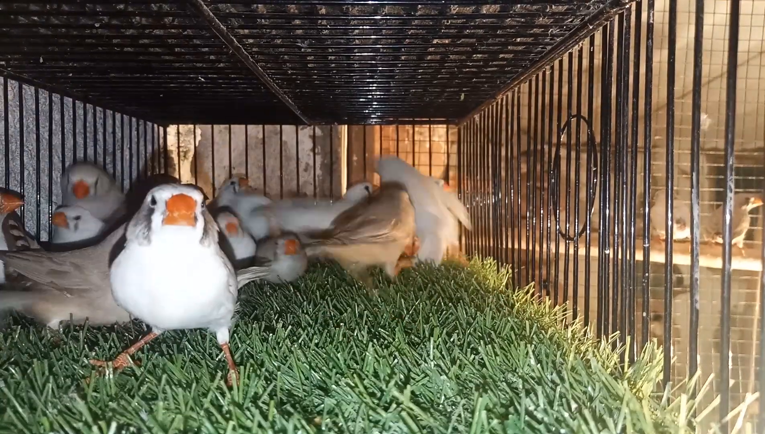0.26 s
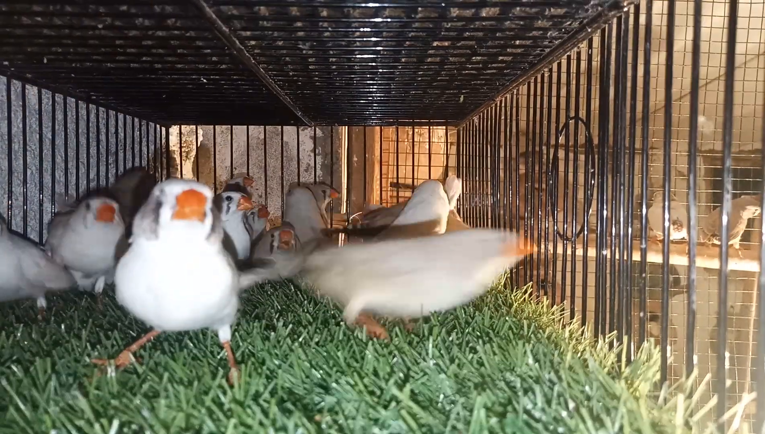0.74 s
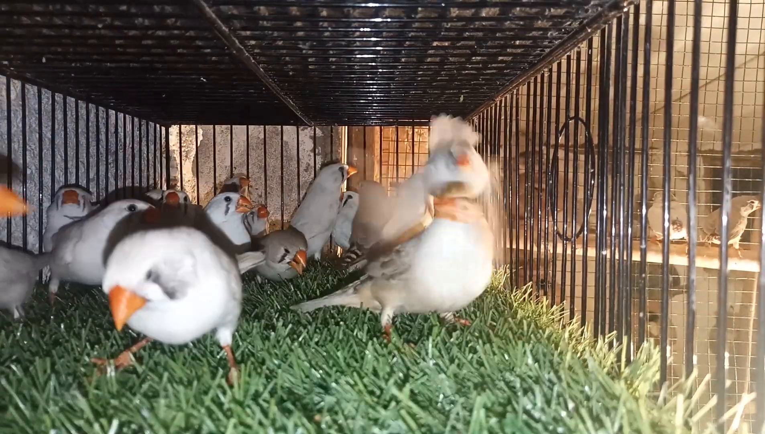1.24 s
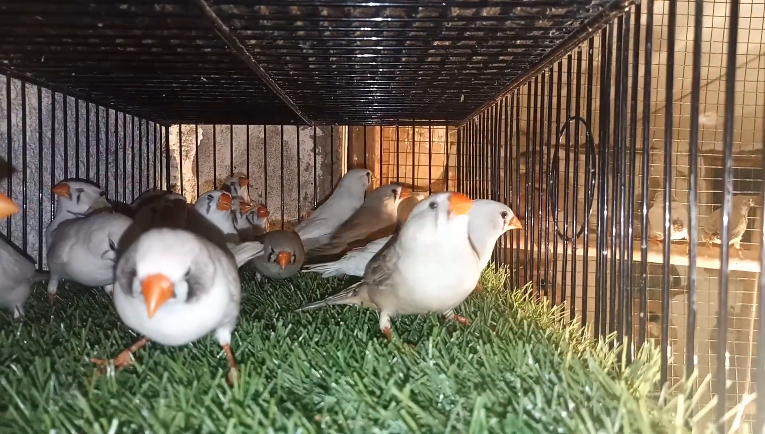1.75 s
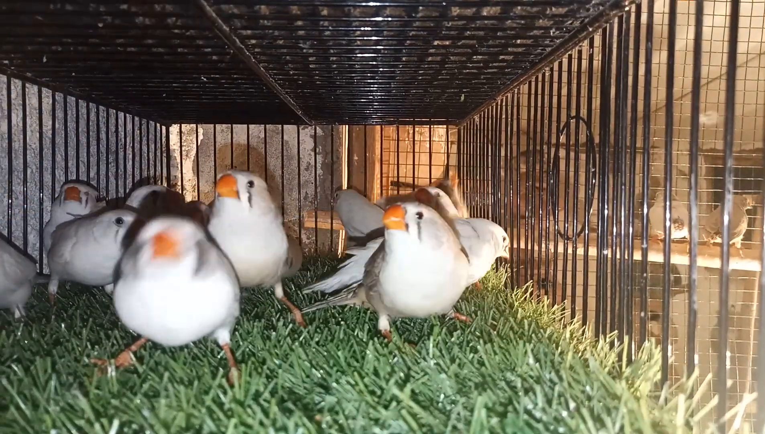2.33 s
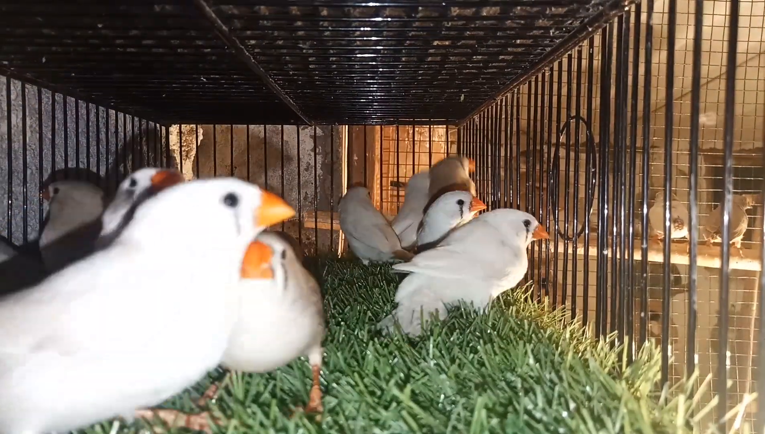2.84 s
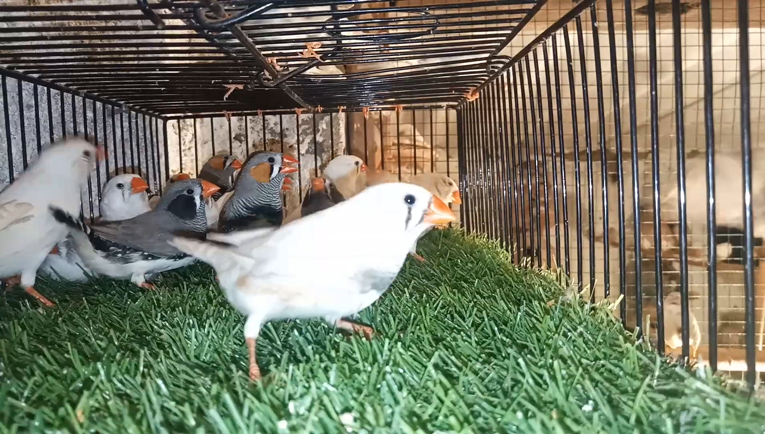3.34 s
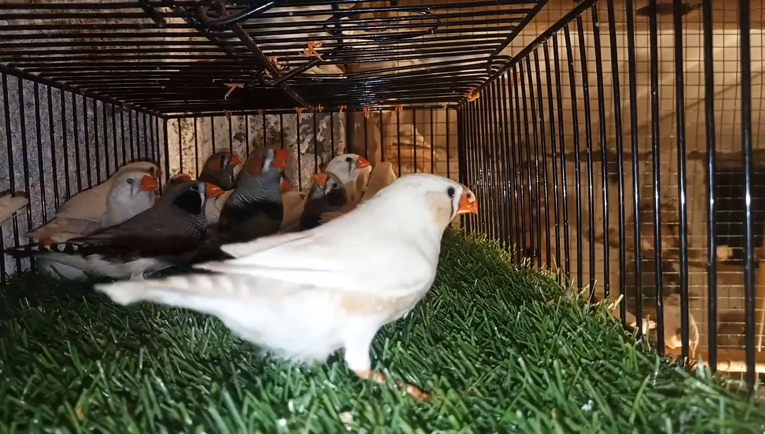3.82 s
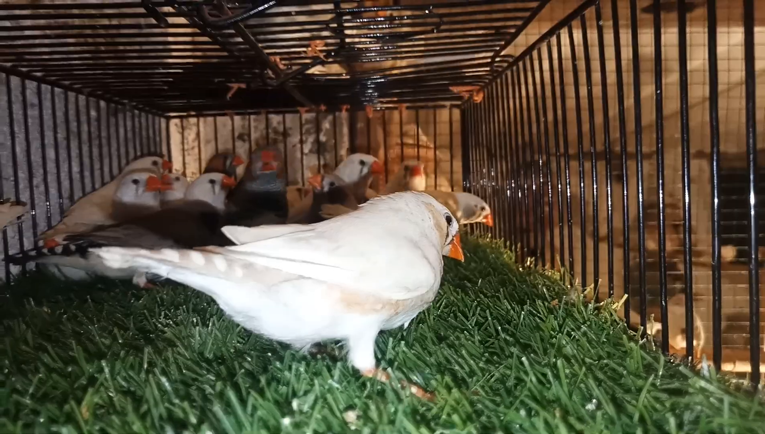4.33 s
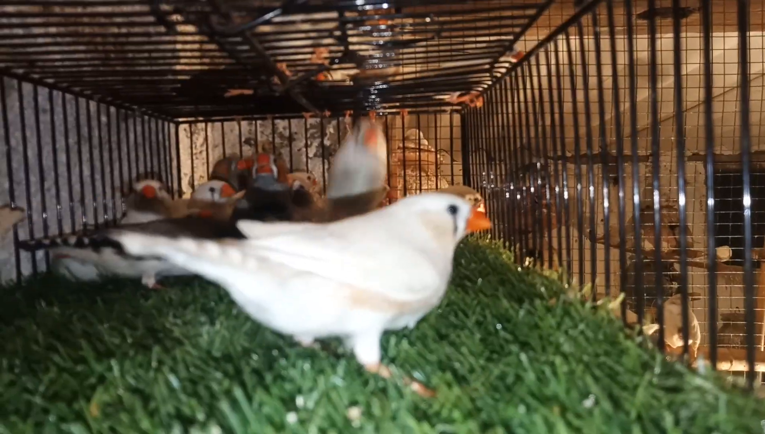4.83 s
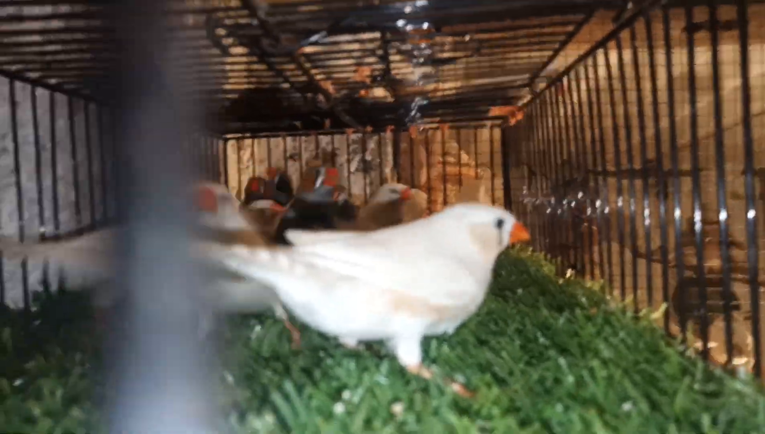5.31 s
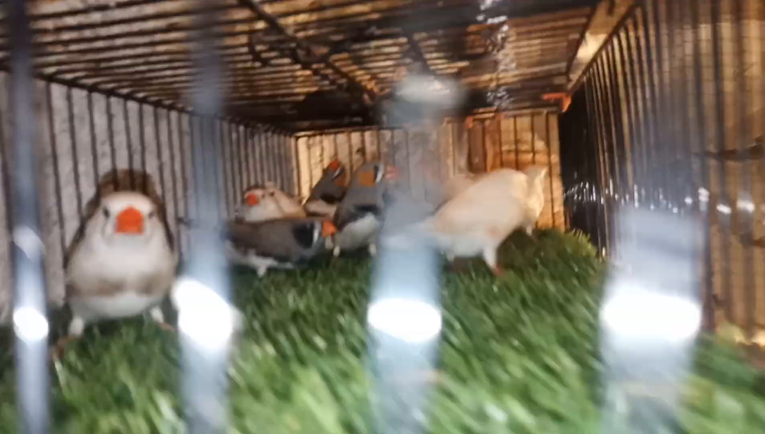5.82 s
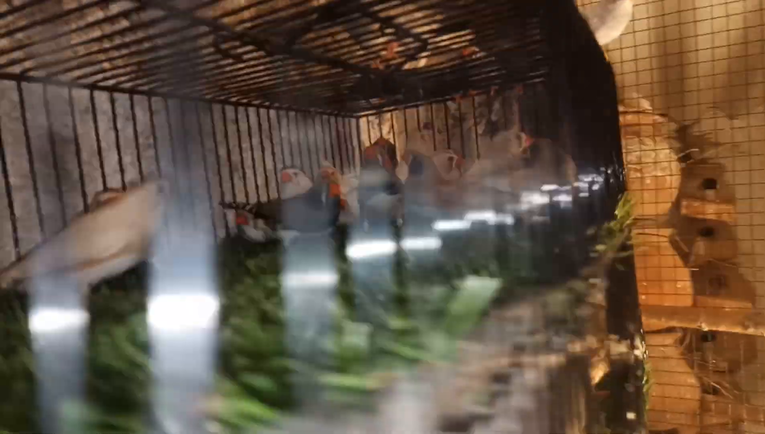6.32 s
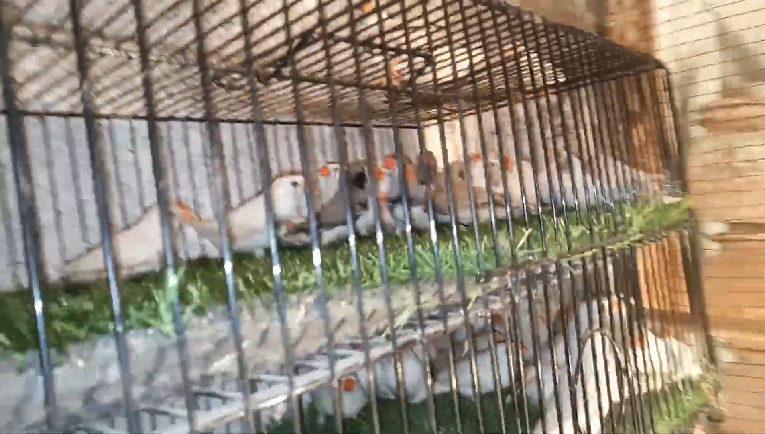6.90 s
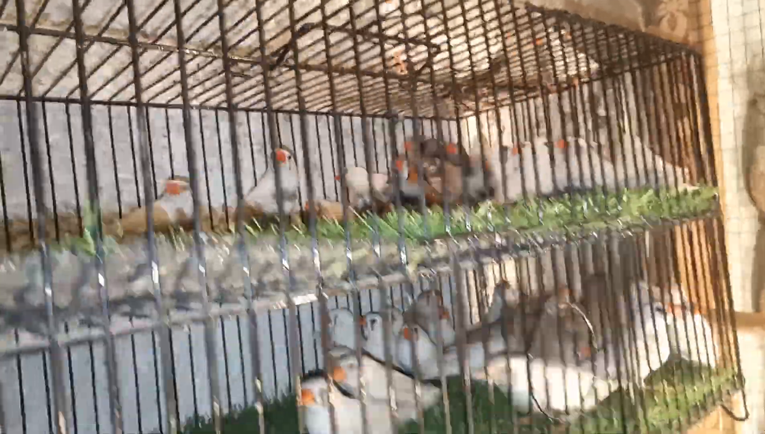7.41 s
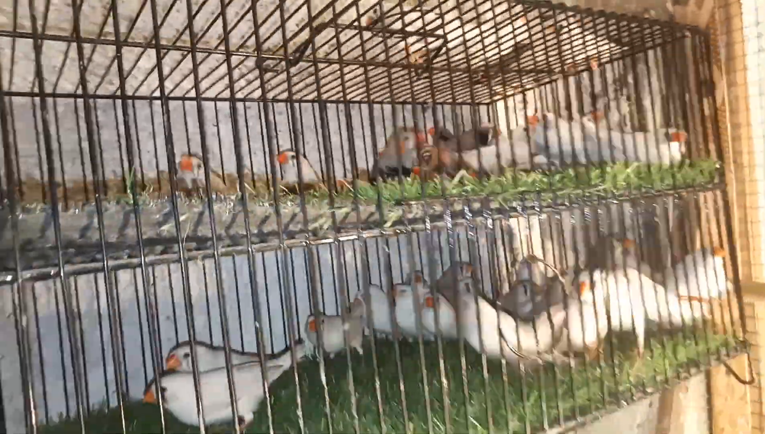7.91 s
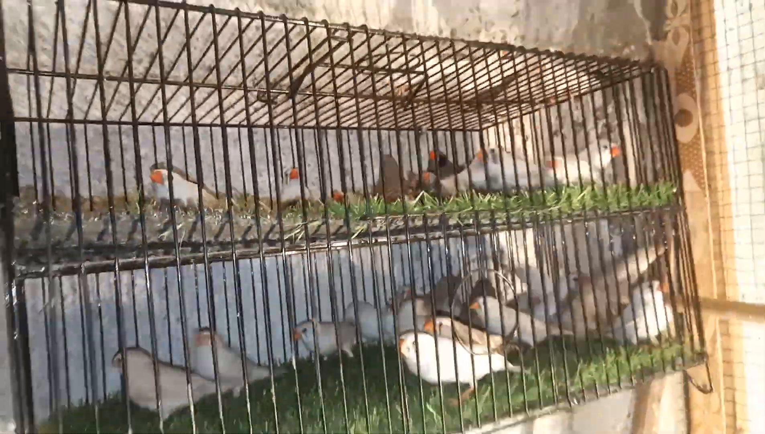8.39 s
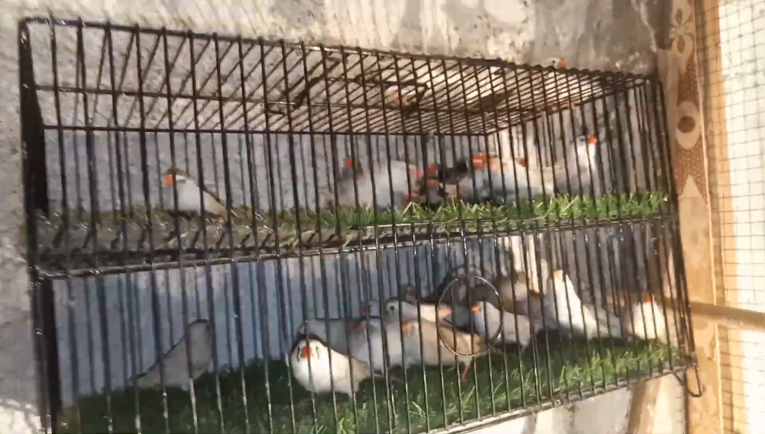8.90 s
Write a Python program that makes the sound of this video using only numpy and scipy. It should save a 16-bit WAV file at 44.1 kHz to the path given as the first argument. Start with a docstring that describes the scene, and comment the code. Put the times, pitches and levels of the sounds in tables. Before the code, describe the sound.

Caged finches honk and chirp in quick nasal bursts, rasping loudest later on, over soft wing rustle, low rumble and a few cage knocks.

```python
"""Short nasal finch calls close by, louder raspy chirps and two screeches further off, and a chattering flock behind.
Place: cages in a hard-walled shed, a phone microphone close to the nearest birds. Calls are overtone stacks shaped
by beak and windpipe; chirps, screeches and faint tones are gliding tones with warble or crackle. Filtered noise
gives wing rustle and a low rumble, decaying sines the cage knocks; decaying noise is the room. The sound drops
out once."""
import sys
import numpy as np
from scipy import signal
from scipy.fft import rfft, irfft
from scipy.io import wavfile
from scipy.ndimage import uniform_filter1d

SR = 44100
rng = np.random.default_rng(int(sys.argv[2]) if len(sys.argv) > 2 else 0)


def to_wav(sig):
    """Store sig (one row per channel, or 1-D mono) as 16-bit WAV at the path in sys.argv[1].

    Samples outside -1..1 are clipped; the rate is SR.
    """
    pcm = np.clip(np.atleast_2d(sig), -1, 1) * 32767
    pcm = np.round(pcm).astype(np.int16)
    wavfile.write(sys.argv[1], SR, pcm.T)  # frames by channels


def convert_level_to_amplitude(level_db):
    """Map a level in decibels to its linear amplitude factor."""
    exponent = np.asarray(level_db, float) / 20
    return 10 ** exponent


N = 403515

# Near finch calls: (start [s], length [s], top pitch [Hz], slant [share of pitch, + ends higher],
# rms before the swell [dB], beak resonance [Hz], windpipe resonance [Hz], windpipe against beak [dB])
NEAR_CALLS = [(-0.04, 0.09, 596.3, -0.0078, -25, 3404, 1670, -13.5),
              (0.122, 0.075, 637, 0.02, -34, 3340, 2240.0, -18),
              (0.217, 0.069, 657, 0.03, -32.5, 3170, 2640, -13.5),
              (0.48, 0.07, 520, 0.02, -39, 3480, 1040, 13),
              (0.672, 0.078, 612, 0.085, -33.5, 4020, 1720, -2),
              (0.86, 0.08, 474, 0.024, -34.5, 4240, 1900.0, 3),
              (0.895, 0.074, 527, -0.044, -27.5, 3860, 1460.0, -7.5),
              (1.19, 0.07, 665.5, -0.0394, -27.5, 3620, 2080.0, -8.5),
              (1.29, 0.074, 596, -0.01, -28.5, 3460, 1330.0, -6),
              (1.51, 0.05, 566.6, 0.0, -33, 3590, 1290.0, -8.5),
              (2.2, 0.045, 644, -0.02, -26.5, 3560, 1610, -8),
              (2.46, 0.13, 600.5, 0.0096, -27.5, 3520, 1420.0, -6),
              (2.71, 0.049, 632, -0.031, -27.5, 3450, 1870.0, -32),
              (2.79, 0.029, 597, -0.059, -37, 3340, 2250.0, -15),
              (2.84, 0.058, 545, -0.026, -38, 3690.0, 2180.0, -15),
              (3.25, 0.093, 620, -0.04, -25.5, 3480, 1930.0, 0),
              (3.665, 0.042, 572, 0.029, -29.5, 3440, 2030.0, -16),
              (4.03, 0.13, 656, -0.086, -31, 4020, 2630, -4.5),
              (4.213, 0.0754, 578.4, 0.04, -27, 3600, 2130.0, 6),
              (4.32, 0.081, 530.5, 0.00033, -30, 3820, 1590, -5),
              (4.715, 0.07, 565, 0.03, -32, 3650, 2100, 2),
              (4.795, 0.045, 550, -0.011, -29.5, 3500, 1790.0, -12.5),
              (4.85, 0.053, 490.0, 0.00075, -36, 4270, 1710, 14),
              (4.95, 0.058, 501, -0.02, -36.5, 3300, 1940.0, 0),
              (5.02, 0.048, 516, -0.01, -29.5, 3500, 2330, -2),
              (5.25, 0.05, 595, -0.074, -33, 3600, 1890.0, 1),
              (5.33, 0.032, 570, -0.031, -36.5, 3450, 2140.0, -12),
              (5.39, 0.033, 549, -0.029, -31.5, 3800, 2020.0, -11.5),
              (5.46, 0.06, 503, -0.022, -36, 3520.0, 2180.0, -6),
              (5.65, 0.023, 570, 0.03, -35.5, 3970, 2200, -4),
              (5.745, 0.058, 660, 0.04, -34.5, 3920, 2610.0, -12),
              (5.8, 0.065, 649.5, -0.07, -25, 3790.0, 2200, -7.5),
              (5.81, 0.056, 506, -0.04, -35.5, 3880, 1000, -5),
              (5.88, 0.055, 636, -0.039, -33, 3640, 2330, -20),
              (6.015, 0.091, 548.5, 0.013, -35.5, 3260, 1680, -2),
              (6.1, 0.071, 558, 0.0029, -31, 3700, 1840.0, -11),
              (6.16, 0.06, 563.6, -0.0406, -33.5, 3620, 1970.0, 3),
              (6.82, 0.1, 599, -0.12, -28.5, 3650, 1900, -17.5),
              (6.925, 0.057, 560, -0.06, -30.5, 3530, 2210, -15),
              (7.07, 0.06, 508, -0.019, -30.5, 3540, 2530.0, -17),
              (7.15, 0.073, 557, -0.062, -35, 4000, 2460.0, 0),
              (7.22, 0.053, 530, -0.103, -33, 3500, 1510, -4.5),
              (7.325, 0.065, 612.5, 0.05, -33, 3780, 1480.0, -6.5),
              (7.38, 0.066, 541.6, 0.015, -29.5, 3720, 1850, -5.5),
              (7.5, 0.18, 643, -0.059, -32.5, 3500, 2490.0, -16.5),
              (8.09, 0.083, 516, -0.098, -38, 3600, 2010.0, -12.5),
              (8.35, 0.11, 495, -0.07, -34, 3900, 1970.0, -15),
              (8.56, 0.11, 493.5, 0.0072, -30, 3640, 1890.0, -17.5),
              (8.72, 0.078, 516, -0.071, -31.5, 3530, 1920.0, -1),
              (8.9, 0.073, 503, -0.04, -35.5, 3730, 2120.0, -18),
              (9.015, 0.18, 513.6, -0.022, -33.0, 3820.0, 2200, -14)]
# Finch voice before beak and windpipe: (frequency [Hz], level [dB])
THROAT_SPECTRUM = [(620, -11.5), (1100, -3), (3000, -1.5), (4300, -2), (5000, -8), (6200, -10.5),
                   (8000, -23.5)]
# Raspy chirps further off: (start [s], length [s], first pitch [Hz], relative level [dB], warble rms [Hz])
CHIRPS = [(.222, 0.033, 2495, -34, 492), (.275, 0.044, 4500, -37, 89), (.298, 0.029, 3850, -28, 450),
          (.478, 0.048, 2603, -19, 602.5), (.49, 0.052, 2193, -26, 60), (1.89, .058, 3926, -34.5, 487),
          (1.95, 0.056, 4400, -29, 39.5), (1.995, .05, 3400, -33, 120), (2.02, 0.045, 3870, -35.5, 587),
          (3.186, .034, 3320, -34.5, 593), (3.27, .05, 3253, -22, 595), (3.965, 0.031, 2700, -26, 333),
          (3.972, 0.044, 3940, -28.5, 248), (3.975, .05, 1795, -30, 298), (4.28, 0.029, 3220, -23.5, 403),
          (4.425, 0.063, 3240, -32.5, 202), (4.55, 0.031, 2394, -33, 196), (4.72, .08, 3737, -29, 500),
          (5.062, 0.04, 3150, -35, 108.4), (6.04, 0.05, 3950, -33, 583), (6.105, .065, 4580, -32, 112),
          (6.165, .07, 3770, -30, 394), (6.331, 0.032, 3290, -17, 700), (6.39, .032, 3450, -19.5, 833),
          (6.43, 0.05, 3610, -21.5, 510), (6.465, 0.02, 2003, -25, 59.6), (6.467, 0.033, 4085, -23, 101),
          (6.554, .022, 4006, -16.5, 580), (6.642, .027, 4100, -14.5, 637), (6.84, 0.06, 3970, -31.5, 403),
          (6.9, .05, 3435, -30, 300), (7.655, 0.045, 2365, -20, 116), (7.668, 0.036, 3298, -14.5, 202),
          (7.69, .054, 2935, -16.5, 116.7), (7.80, 0.069, 2528, -14, 214.5), (7.91, 0.032, 4470, -23.5, 61),
          (7.94, 0.13, 2195, -23.5, 110.3), (7.96, .06, 4130, -24, 354), (8.033, 0.029, 3850, -10.5, 149.3),
          (8.06, 0.028, 4890, -20, 156), (8.145, .044, 3424, -20, 597), (8.18, .05, 4120, -19.5, 183),
          (8.375, 0.054, 1983, -33, 39), (8.385, 0.098, 3930, -31, 108), (8.435, .03, 3317, -23.5, 688),
          (8.48, 0.039, 3625, -22, 199), (8.568, 0.036, 3830, -22, 118), (8.655, 0.089, 3450, -31, 151),
          (8.727, .06, 3824, -25.5, 308), (8.77, 0.049, 3470, -32.5, 200), (8.745, 0.046, 1610, -32.5, 348)]
# Chirp overtones, multiples 1 to 5 of the pitch, before effort: (relative level [dB])
CHIRP_OVERTONES_DB = [-1.5, -10.5, -13.5, -26, -13.5]
# Faint far whistles, hoots and low drones, and the octave of the second screech ringing on near 6 kHz:
# (start [s], length [s], first pitch [Hz], last pitch [Hz], relative level [dB])
FAINT_TONES = [(.52, 0.18, 637, 797, -45.5), (.72, 0.31, 784, 759, -48.5), (1.48, 0.34, 2850, 2820, -47.5),
               (1.86, 0.04, 1364, 1280, -44), (2.02, 0.1, 1343, 1330, -39), (3.27, 0.16, 699, 653, -41.5),
               (3.46, 0.087, 702, 674, -42), (5.26, 0.13, 602, 634, -47.5), (5.42, 0.24, 677, 651, -50.5),
               (6.45, 0.26, 597.5, 645, -45.5), (7.04, 0.041, 4770, 4830, -49.5),
               (1.9, 0.68, 79.8, 76, -46.5), (3.2, 0.69, 75.8, 72.7, -46.5), (6.75, 0.044, 6050, 5920, -47)]
# Background in front of the microphone: (time [s], far flock [dB], wing rustle [dB], rumble [dB])
BACKGROUND = [(0, -44.5, -44.5, -44), (.74, -47, -43.5, -42.5), (1.95, -49.5, -48.5, -43.5),
              (2.11, -41, -45.5, -46), (2.5, -53.5, -45, -49.5), (2.73, -37.5, -48.5, -51.5),
              (3.0, -42.5, -50.5, -48), (3.21, -41, -41, -37.5), (3.45, -44, -45, -45.5),
              (4.23, -37.5, -48.5, -49), (4.56, -41.5, -46, -46.5), (5.2, -38.5, -47.5, -50.5),
              (6.22, -42, -46, -45), (6.6, -37.5, -39, -44), (7.45, -39, -45, -43), (8.0, -40.5, -37, -41),
              (8.6, -34, -41, -47.5), (8.9, -43, -45, -49.5), (9.15, -45.5, -45.5, -50.5)]
# Colour of the wing rustle: (frequency [Hz], relative density [dB per Hz])
RUSTLE_SPECTRUM = [(110, -35), (180, -7), (323, -5), (634, -5), (1230, -8.5), (2000, -4.5), (2600, 0),
                   (4400, -120)]
# Colour of the rumble: (frequency [Hz], relative density [dB per Hz])
RUMBLE_SPECTRUM = [(15, -60), (25, -34.5), (38, -25.5), (70, -9), (97, 1), (152, -2.5), (176, -6),
                   (210, -28), (260, -30.5), (340, -53), (570, -120)]
# Knocks on the cage: (time [s], ring peak [dB], click at its start [dB])
KNOCKS = [(4.48, -25.5, -56), (8, -44, -28), (8.21, -41, -39), (8.417, -42.5, -48), (8.52, -35.5, -28.5)]
# Ringing modes of the cage: (frequency [Hz], relative level [dB], 60 dB decay time [s])
CAGE_MODES = [(365, -3, 0.1), (413, 5.5, 0.43), (490, 8, 0.45)]
# Screeches that slide fast, then hold:
# (start [s], length [s], first pitch [Hz], last pitch [Hz], relative starting level [dB])
SCREECHES = [(6.5395, 0.031, 4040, 2994, -8), (6.638, 0.055, 4487, 2976, -11)]
# Microphone response: (frequency [Hz], gain [dB])
MICROPHONE = [(1500, -0.5), (4200, 0.5), (5000, -4), (5800, -18), (6100, -11.5), (6350, -20), (6800, -30.5),
              (10500, -30), (12200, -24), (14000, -33)]
# Dropout: (lowest from [s], lowest until [s], end of the sag that follows [s])
DROPOUT_S = (3.053, 3.165, 3.19)

ROOM_T60_S = 0.32
# A call's ends lie ARCH_SHARE below its top pitch at ARCH_LOUD_DB and above, less for softer calls
ARCH_SHARE, ARCH_DB_PER_DB, ARCH_LOUD_DB = 0.0614, 0.27, -27.5
GLIDE_SHARE = 0.54  # part of a call's slant that is an even glide; the rest falls on its ends
BEAK_WIDTH_HZ, WINDPIPE_WIDTH_HZ = 360, 1040
OVERTONE_FLICKER_DB, RUSTLE_FLUTTER_DB = 2.5, 2.2
# A chirp is drawn towards CHIRP_HOME_HZ, all the way once its warble reaches PULL_WARBLE_HZ
CHIRP_HOME_HZ, PULL_WARBLE_HZ = 3727, 751
WARBLE_RATE_HZ, THROAT_WIDTH_HZ = 110, 620
WARBLE_GROWS_S = 0.013  # a chirp starts as a plain tone, its rasp spreads over this time
OVERTONE_LOSS_DB_PER_OCTAVE = 9  # higher chirps are purer
OVERTONE_GAIN_DB_PER_KHZ = 12.5  # per kHz of warble: raspier chirps are brighter
RASP_DB, RASP_WIDTH = -2.5, 2.8  # breath level at full pull, band width per Hz of warble
FAINT_WAVER_HZ, FAINT_WAVER_RATE_HZ, FAINT_THROB = 11, 14, 0.25  # waver rms for a 700 Hz tone
SCREECH_SETTLE_S, SCREECH_OCTAVE_DB, SCREECH_FADE_DB = 0.008, 1, -12
HISS_DB = -76  # before the overall gain
DROPOUT_DB, SAG_DB, OVERALL_GAIN_DB = -48, -7, -0.27


def in_time(rows):
    """Columns of a curve table, one value per sample."""
    s, *columns = np.transpose(rows)
    return [np.interp(np.arange(N) / SR, s, c) for c in columns]


def at_hz(points, hz):
    """A spectrum table read on a log-frequency axis."""
    table_hz, table_db = np.transpose(points)
    return np.interp(np.log(np.abs(hz) + 1), np.log(table_hz), table_db)


def rms_one(x):
    """Scale to unit rms."""
    return x / np.sqrt(np.mean(x ** 2) + 1e-20)


def coloured(x, spectrum):
    """Filter by a spectrum table."""
    gain = convert_level_to_amplitude(at_hz(spectrum, np.fft.rfftfreq(N, 1 / SR)))
    return irfft(rfft(x) * gain, N)


def wobble(size, rate_hz):
    """A random line through normal-distributed knots, rate_hz knots a second."""
    knots = rng.standard_normal(int(size * rate_hz / SR) + 2)
    return np.interp(np.arange(size) * rate_hz / SR, np.arange(len(knots)), knots)


def add(track, start_s, sound):
    """Mix a sound in at its time."""
    i = int(start_s * SR)
    track[max(i, 0):max(i + len(sound), 0)] += sound[max(-i, 0):N - i]


def played(rows, voice):
    """One track holding a voice for each row."""
    track = np.zeros(N)
    for start_s, *row in rows:
        add(track, start_s, voice(*row))
    return track


def peak(hz, centre_hz, width_hz):
    """Gain of a resonance, 1 on top."""
    return 1 / (1 + ((hz - centre_hz) / width_hz) ** 2)


def room(x):
    """Dense echoes of hard walls: noise that builds in a few ms and dies away, scaled to unit energy."""
    t = np.arange(SR // 2) / SR
    build = np.minimum(t / 0.0058, 1)
    tail = rng.standard_normal(len(t)) * convert_level_to_amplitude(-60 * t / ROOM_T60_S) * build
    return signal.fftconvolve(x, tail / np.sqrt(np.sum(tail ** 2)))[:N]


def finch_call(length_s, first_hz, mid_hz, last_hz, level_db, beak_hz, pipe_hz, pipe_db):
    """Unsteady overtones on an arched pitch, shaped by two resonances: beak and windpipe."""
    u = np.linspace(-1, 1, int((length_s + 0.0206) * SR))
    glide_hz = GLIDE_SHARE * (last_hz - first_hz) / 2
    end_bend_hz = np.where(u < 0, first_hz - mid_hz + glide_hz, last_hz - mid_hz - glide_hz)
    bend = np.abs(u * (1 + 0.02028 / length_s)) ** 2.94
    pitch = mid_hz + glide_hz * u + end_bend_hz * bend
    pitch = pitch * (1 + 0.004 * wobble(len(u), 200.0))
    k = np.arange(1, 13)[:, None]
    uneven_db = rng.normal(0, 2.8, k.shape)
    flicker_cycles = rng.random(k.shape) + rng.uniform(8, 25, k.shape) * length_s * u
    lift_db = uneven_db + OVERTONE_FLICKER_DB * np.sin(2 * np.pi * flicker_cycles)
    beak = peak(k * pitch, beak_hz, BEAK_WIDTH_HZ)
    windpipe = convert_level_to_amplitude(pipe_db) * peak(k * pitch, pipe_hz, WINDPIPE_WIDTH_HZ)
    cycles = np.cumsum(pitch) / SR + rng.random(k.shape)
    # turbulent air roughens each overtone into a line with a noisy skirt
    rasp = 1 + 0.3 * np.array([wobble(len(u), 600.0) for _ in k])
    strength = convert_level_to_amplitude(at_hz(THROAT_SPECTRUM, k * pitch) + lift_db) * (beak + windpipe) * rasp
    voice = np.sum(strength * np.sin(2 * np.pi * k * cycles), axis=0)
    swell = np.clip(np.minimum((1 + u) / 0.55, (1 - u) / 0.4), 0, 1)
    return convert_level_to_amplitude(level_db) * rms_one(voice) * swell


def near_call(length_s, top_hz, slant, level_db, *tract):
    """A finch call close to the microphone, its pitch arch following from its effort."""
    arch = ARCH_SHARE * convert_level_to_amplitude(ARCH_DB_PER_DB * min(level_db - ARCH_LOUD_DB, 0))
    first_hz, last_hz = top_hz * (1 - arch - slant), top_hz * (1 - arch + slant)
    return finch_call(length_s, first_hz, top_hz, last_hz, level_db, *tract)


def far_flock(count):
    """Many overlapping calls at random times and pitches, mostly room, evened out to a steady chatter."""
    draw = rng.random((count, 8))
    start_s = (np.arange(count) + 2 * draw[:, 0] - 2) / count * N / SR
    length_s = 0.05 + 0.08 * draw[:, 1]
    mid_hz = 480 + 200 * draw[:, 2]
    first_hz, last_hz = mid_hz * (1 - 0.15 * draw[:, 3]), mid_hz * (1 - 0.12 * draw[:, 4])
    level_db = -8.0 * draw[:, 5]
    beak_hz, pipe_hz = 3350 + 600.0 * draw[:, 6], 1500 + 900.0 * draw[:, 7]
    pipe_db = np.full(count, -5.0)
    rows = np.c_[start_s, length_s, first_hz, mid_hz, last_hz, level_db, beak_hz, pipe_hz, pipe_db]
    calls = played(rows, finch_call)
    chatter = convert_level_to_amplitude(-9.5) * calls + room(calls)
    power = np.abs(uniform_filter1d(chatter ** 2, SR // 5))
    return chatter / np.sqrt(power + 0.015 * np.mean(chatter ** 2))


def wing_rustle(level_db):
    """Broad noise of wings, its level fluttering at random."""
    noise = rms_one(coloured(rng.standard_normal(N), RUSTLE_SPECTRUM))
    return noise * convert_level_to_amplitude(level_db + RUSTLE_FLUTTER_DB * wobble(N, 29.0))


def low_rumble(level_db):
    """Low-frequency noise that drifts slowly in level."""
    noise = rms_one(coloured(rng.standard_normal(N), RUMBLE_SPECTRUM))
    return noise * convert_level_to_amplitude(level_db + 1.5 * wobble(N, 7.0))


def whistle(length_s, first_hz, last_hz, level_db, warble_hz, overtones_db, warble_rate_hz, throb):
    """A gliding tone with overtones; an uneven pitch warble and level throb roughen it."""
    u = np.linspace(0, 1, int(length_s * SR))
    grown = np.minimum(u * length_s / WARBLE_GROWS_S, 1)
    swing_rate_hz = warble_rate_hz * (1 + 0.4 * wobble(len(u), 150.0))
    swings = np.cumsum(swing_rate_hz) / SR + rng.random()
    swing_hz = np.sqrt(2) * warble_hz * np.sin(2 * np.pi * swings) * grown
    pitch = first_hz + (last_hz - first_hz) * u + swing_hz
    phase = 2 * np.pi * np.cumsum(pitch) / SR
    # louder chirps are richer in overtones
    effort_db = level_db + 18 - OVERTONE_LOSS_DB_PER_OCTAVE * np.log2(first_hz / 3000)
    effort_db += OVERTONE_GAIN_DB_PER_KHZ * (warble_hz - 650) / 1000
    tone = np.zeros(len(u))
    for k, db in enumerate(overtones_db):
        # only the overtones above the fundamental grow in and follow the effort
        gain = convert_level_to_amplitude(db + effort_db * (k > 0)) * grown ** min(k, 1)
        tone += gain * np.sin((k + 1) * phase)
    # the throat favours the middle of a wide swing, so the ends of it sound weaker
    focus = np.exp(-(swing_hz / THROAT_WIDTH_HZ) ** 2)
    tone = tone * rms_one(focus * (1 + throb * wobble(len(u), warble_rate_hz)))
    # soft chirps start gently
    attack = np.clip(-(level_db + 16) / 30, 0.03, 0.35)
    swell = np.clip(np.minimum(u / attack, (1 - u) / 0.13), 0, 1)
    return convert_level_to_amplitude(level_db + 2.5) * tone * swell


def chirp(length_s, first_hz, level_db, warble_hz):
    """A raspy chirp gliding towards the throat pitch, with breath noise ringing around it."""
    pull = min(warble_hz / PULL_WARBLE_HZ, 1)
    last_hz = first_hz + (CHIRP_HOME_HZ - first_hz) * pull
    tone = whistle(length_s, first_hz, last_hz, level_db, warble_hz, CHIRP_OVERTONES_DB,
                   WARBLE_RATE_HZ, throb=0.41)
    # two equal resonators at the mean of first and last pitch
    radius = np.exp(-np.pi * RASP_WIDTH * warble_hz / SR)
    angle = np.pi * (first_hz + last_hz) / SR
    resonator = [0.91, 0.0066, -1, 1, -2 * radius * np.cos(angle), radius * radius]
    breath = rms_one(signal.sosfilt([resonator] * 2, rng.standard_normal(len(tone))))
    loudness = np.sqrt(np.abs(uniform_filter1d(tone ** 2, SR // 150, mode="constant")))
    grown = np.minimum(np.arange(len(tone)) / (WARBLE_GROWS_S * SR), 1)
    return tone + convert_level_to_amplitude(RASP_DB) * pull * loudness * breath * grown


def faint_tone(length_s, first_hz, last_hz, level_db):
    """A faint gliding tone without overtones that wavers slowly in pitch."""
    waver_hz = FAINT_WAVER_HZ * np.sqrt(first_hz / 700)
    return whistle(length_s, first_hz, last_hz, level_db, waver_hz, [0], FAINT_WAVER_RATE_HZ, FAINT_THROB)


def cage_knocks():
    """Each knock rings the decaying cage modes and adds a short dull click of noise."""
    out, t = np.zeros(N), np.arange(SR // 3) / SR
    ring = sum(convert_level_to_amplitude(db - 60 * t / t60) * np.sin(2 * np.pi * hz * t) for hz, db, t60 in CAGE_MODES)
    for start_s, level_db, click_db in KNOCKS:
        dull = signal.lfilter([0.5, 0, -0.5], [1, -1.8, 0.82], rng.standard_normal(len(t)))
        click = rms_one(dull) * convert_level_to_amplitude(click_db - 60 * t / 0.02)
        add(out, start_s, convert_level_to_amplitude(level_db) * ring / np.max(ring) + click)
    return out


def screech(length_s, first_hz, last_hz, level_db):
    """A sharp-edged screech: the pitch slides and settles, its octave grows in, the level crackles."""
    t = np.arange(int(length_s * SR)) / SR
    left = np.exp(-(t / SCREECH_SETTLE_S) ** 2)  # share of the slide still to go
    pitch = last_hz + (first_hz - last_hz) * left + 200.0 * wobble(len(t), 400.0)
    phase = 2 * np.pi * np.cumsum(pitch) / SR
    octave = convert_level_to_amplitude(SCREECH_OCTAVE_DB) * (1 - left) * np.sin(2 * phase)
    tone = np.sin(phase) + octave + convert_level_to_amplitude(-10.0) * np.sin(3 * phase) + convert_level_to_amplitude(-9.0) * np.sin(4 * phase)
    crackle = 1 + 0.6 * (1 - left) * wobble(len(t), 1500.0)
    edges = np.clip(np.minimum(t / 0.0012, (length_s - t) / 0.006), 0, 1)
    return convert_level_to_amplitude(level_db + SCREECH_FADE_DB * (1 - left)) * crackle * tone * edges


def scene():
    """All sources in the shed; distant birds send more of their sound by way of the room."""
    flock_db, rustle_db, rumble_db = in_time(BACKGROUND)
    near = played(NEAR_CALLS, near_call)
    flock = convert_level_to_amplitude(flock_db) * far_flock(count=180)
    chirps = played(CHIRPS, chirp) + played(SCREECHES, screech)
    tones = played(FAINT_TONES, faint_tone)
    direct = near + chirps + convert_level_to_amplitude(-0.5) * tones + cage_knocks()
    echoes = room(convert_level_to_amplitude(-7.0) * near + convert_level_to_amplitude(0.5) * chirps + convert_level_to_amplitude(-2.5) * tones)
    return (direct + echoes + flock + wing_rustle(rustle_db) + low_rumble(rumble_db))[None]


def suppressor(x, floor_db, slope):
    """Noise suppression: the band of the birds is turned down as its level falls below floor_db."""
    high = signal.sosfiltfilt(signal.butter(2, 900, "high", fs=SR, output="sos"), x)
    level_db = 10 * np.log10(np.abs(uniform_filter1d(high ** 2, SR // 50)) + 1e-12)
    return x - high + high * convert_level_to_amplitude(slope * np.clip(level_db - floor_db, -15, 0))


def hiss():
    """Faint steady white noise."""
    return convert_level_to_amplitude(HISS_DB) * rng.standard_normal(N)


def dropout_gain():
    """Overall gain with one short dropout: the level returns, sags, then snaps back."""
    off_s, on_s, full_s = DROPOUT_S
    times_s = [off_s - 0.001, off_s, on_s, on_s + 0.0012, full_s, full_s + 0.0017]
    change_db = np.array([0, DROPOUT_DB, DROPOUT_DB, 0, SAG_DB, 0])
    return np.interp(np.arange(N) / SR, times_s, convert_level_to_amplitude(OVERALL_GAIN_DB + change_db))


def roll_off(x):
    """The treble ends steeply here."""
    return signal.sosfilt(signal.butter(12, 15550, fs=SR, output="sos"), x)


def record(dry):
    """Dull microphone, noise suppression, faint hiss and one short dropout."""
    heard = coloured(dry[0], MICROPHONE)
    cleaned = suppressor(heard, floor_db=-31.0, slope=0.4)
    mix = (cleaned + hiss()) * dropout_gain()
    return roll_off(mix[None])


dry = scene()
out = record(dry)
to_wav(out)
```